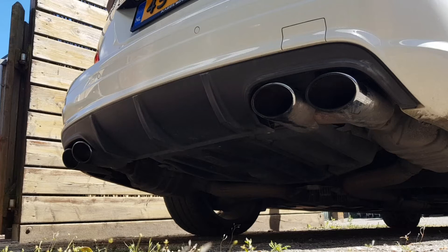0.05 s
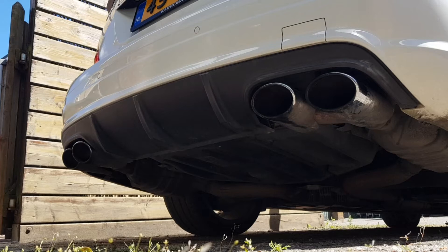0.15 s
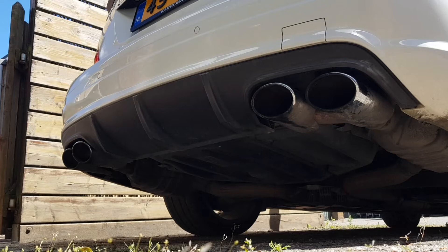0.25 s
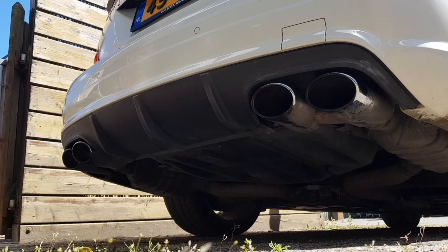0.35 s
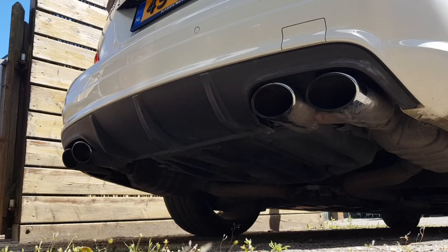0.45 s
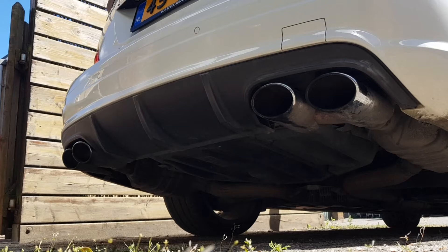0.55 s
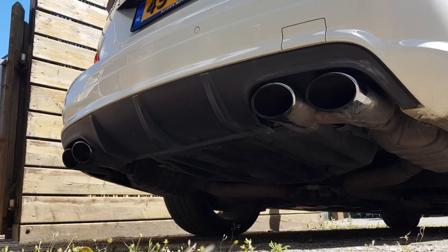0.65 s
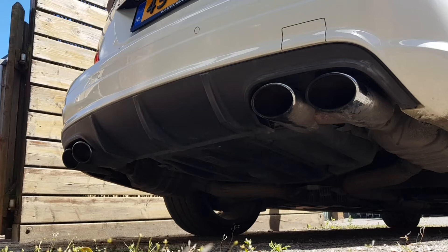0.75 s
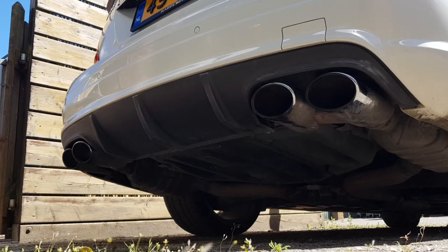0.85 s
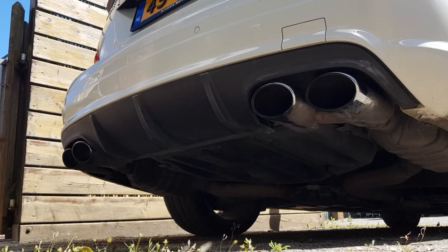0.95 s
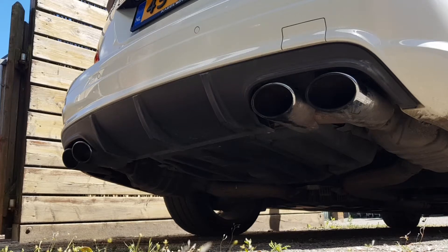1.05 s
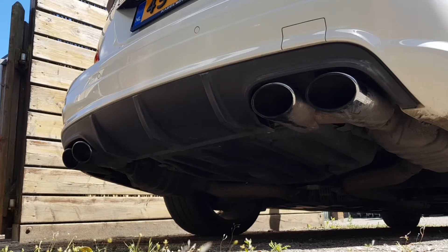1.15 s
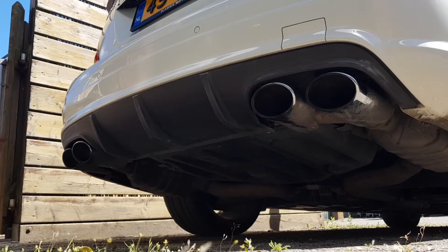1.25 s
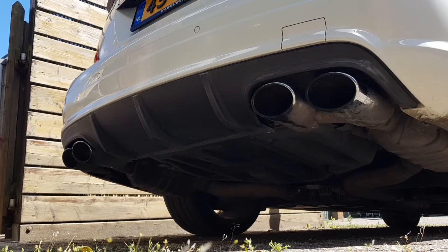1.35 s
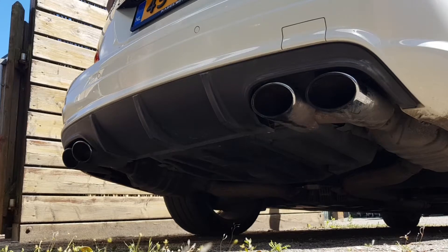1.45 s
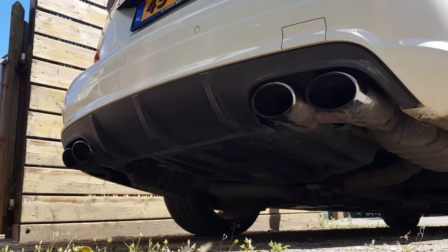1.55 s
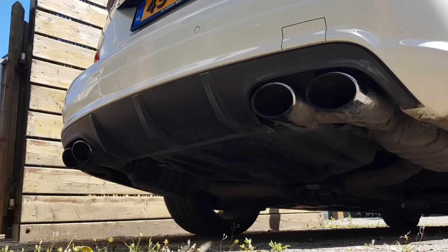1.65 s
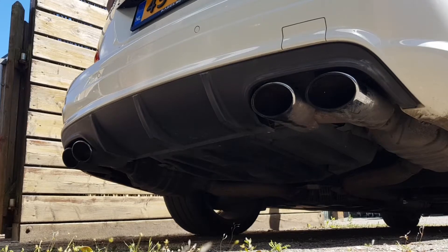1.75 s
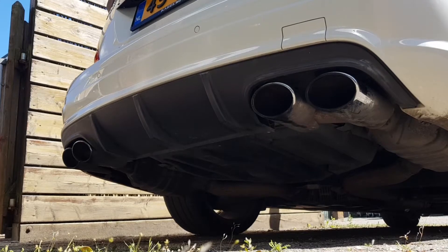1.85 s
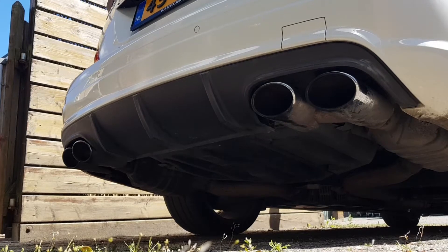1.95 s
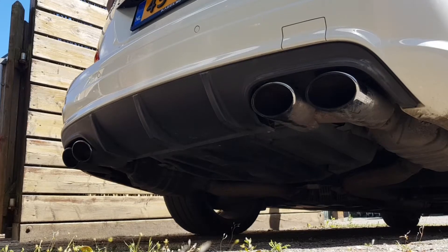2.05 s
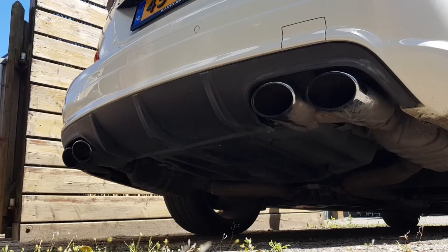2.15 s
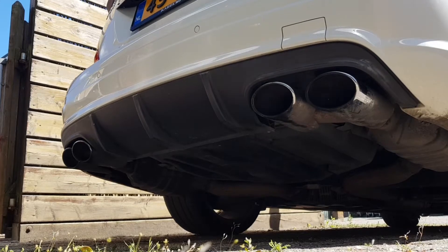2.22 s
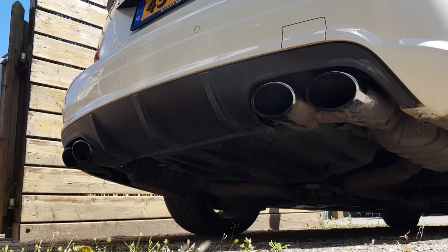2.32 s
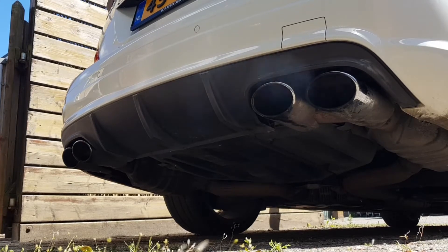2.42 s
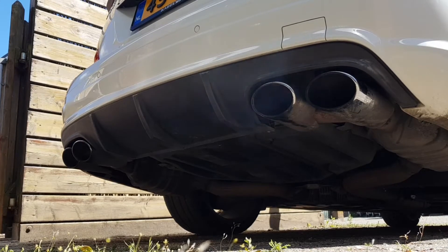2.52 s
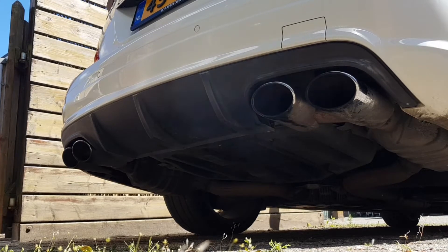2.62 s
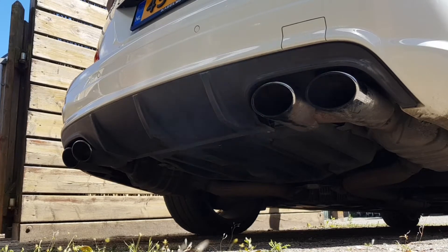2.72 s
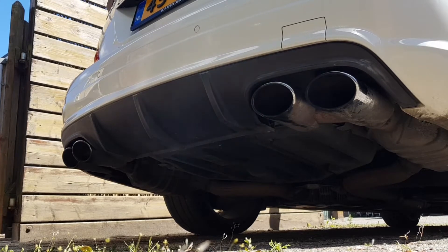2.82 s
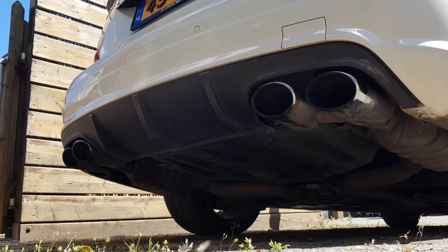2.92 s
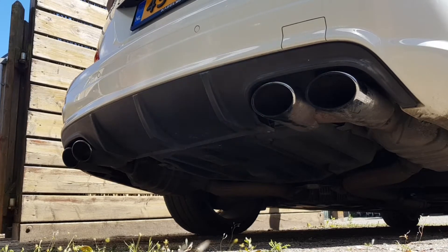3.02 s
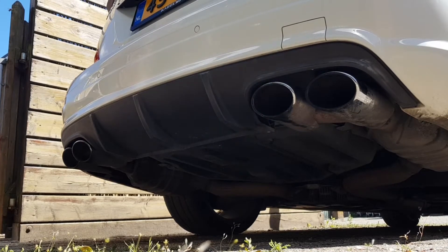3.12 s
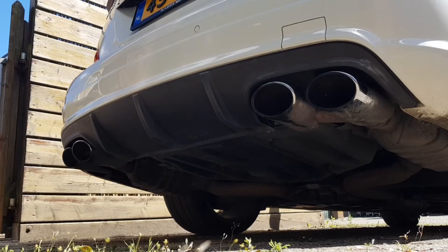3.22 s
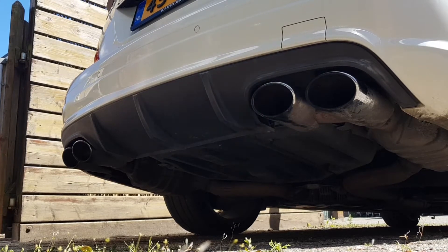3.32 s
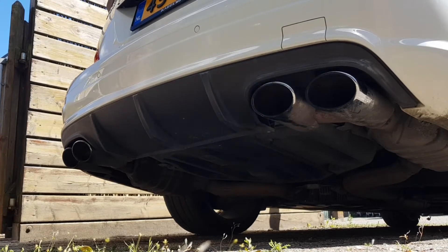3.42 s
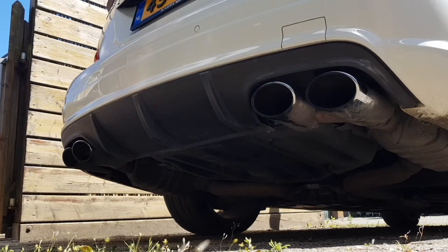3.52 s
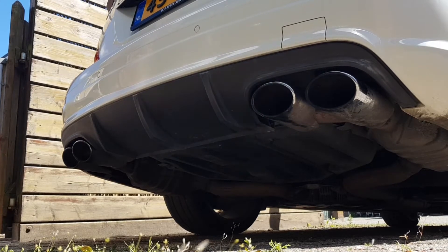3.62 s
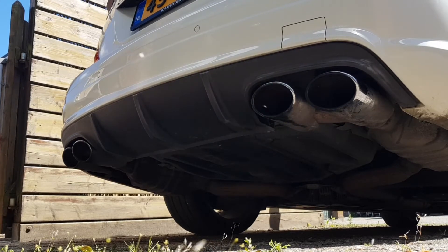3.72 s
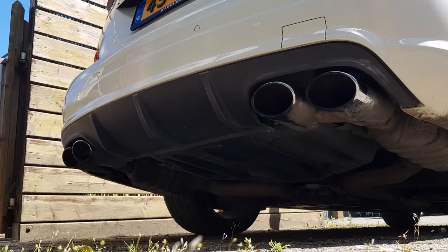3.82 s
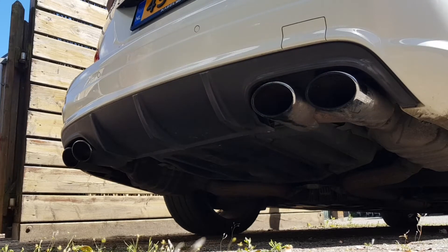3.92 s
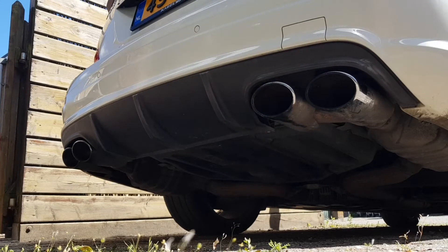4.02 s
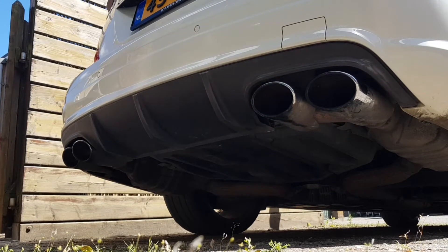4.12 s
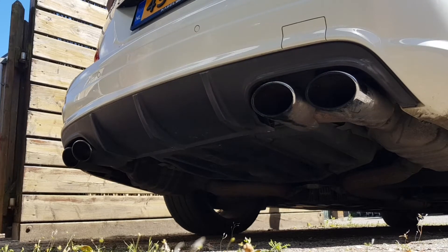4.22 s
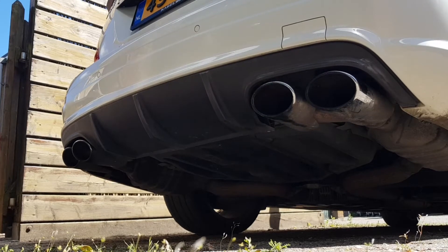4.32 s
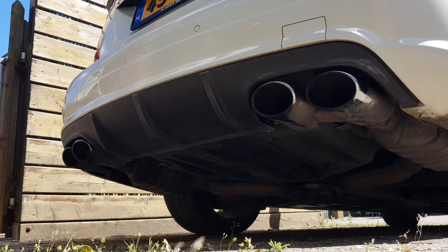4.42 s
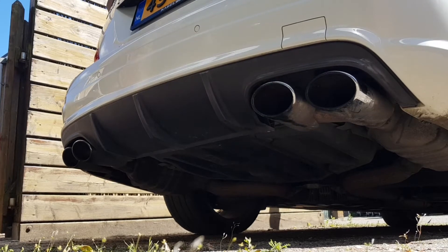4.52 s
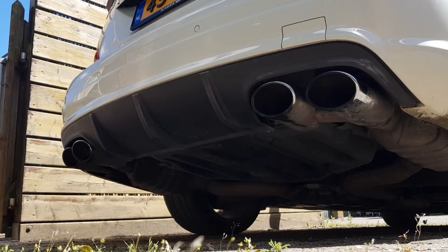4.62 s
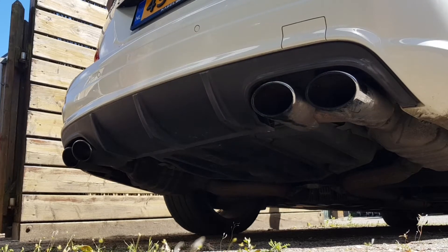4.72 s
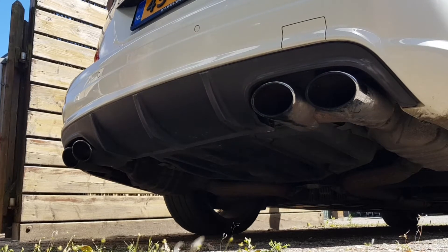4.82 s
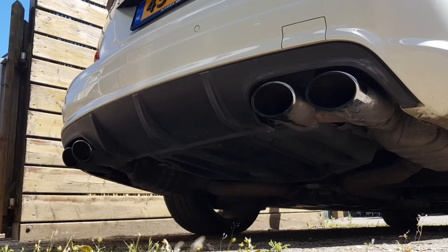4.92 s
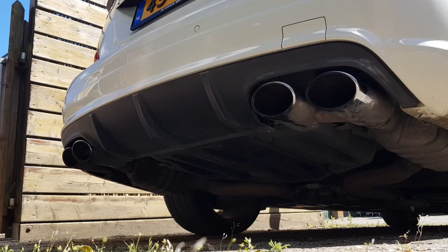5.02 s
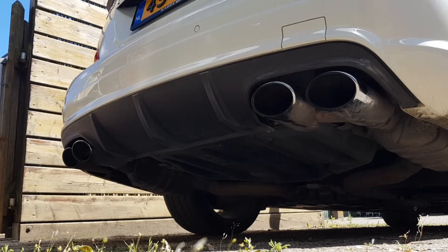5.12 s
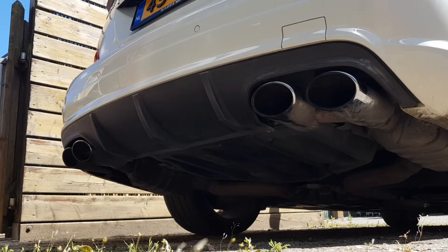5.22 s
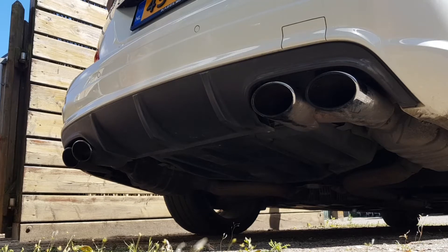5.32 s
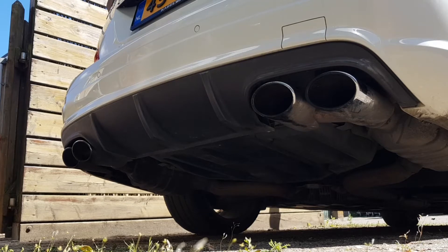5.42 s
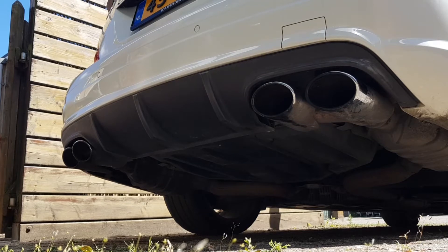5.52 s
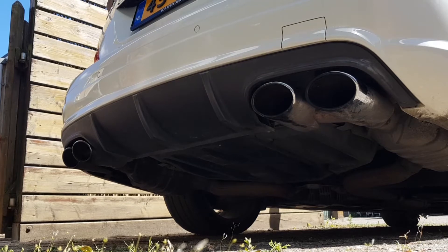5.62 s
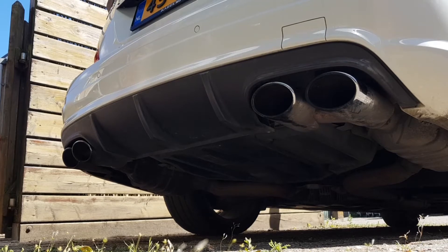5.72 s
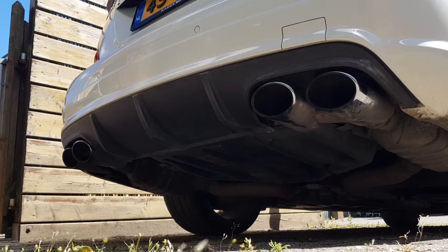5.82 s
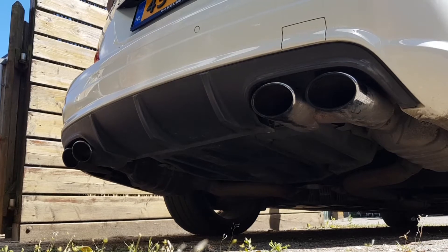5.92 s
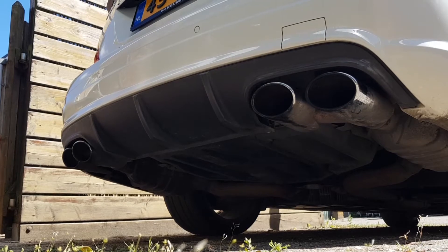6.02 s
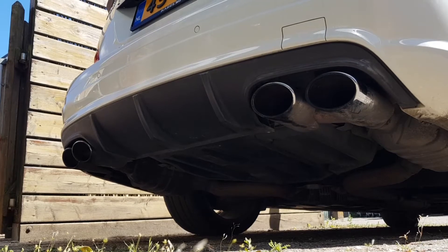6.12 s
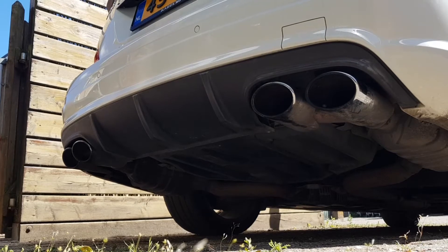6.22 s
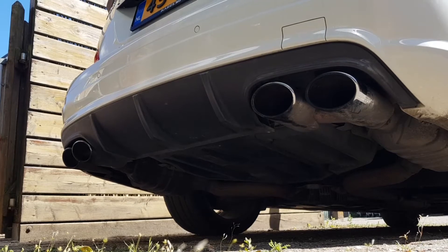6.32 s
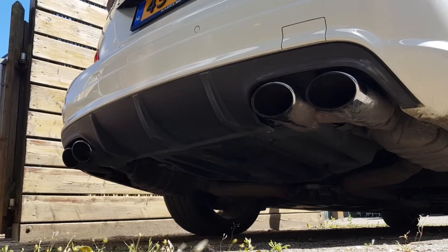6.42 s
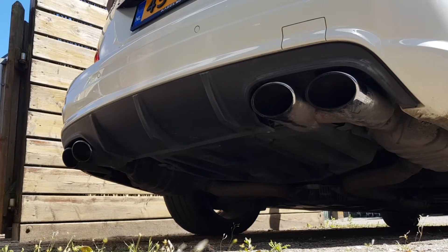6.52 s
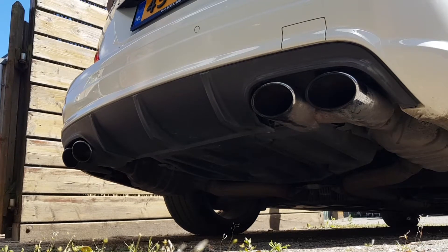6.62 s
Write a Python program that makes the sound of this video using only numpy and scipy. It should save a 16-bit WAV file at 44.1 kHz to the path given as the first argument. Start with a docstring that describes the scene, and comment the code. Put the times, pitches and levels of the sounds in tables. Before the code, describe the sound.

Close behind the tailpipes, a large engine cranks with whining gears, catches in a deep burst of revs, then burbles into uneven idle.

```python
"""Just behind a car's tailpipes, beside a wooden fence, a big V8 is started in quiet outdoor air.
The starter clashes in with bands of noise and ringing gear modes, then whirrs and whines through six strokes.
The engine catches with a deep sine boom, flares and sinks to a lumpy idle with faint valve ticks.
Each firing is an impulse rounded into a thump by the silencer, with bursts of noise for sputter and gas.
Late-burning charges pop and burble: filtered impulses, noise bursts and short notes ring in the pipe."""
import sys
import numpy as np
from scipy import signal
from scipy.fft import rfft, irfft, next_fast_len
from scipy.io import wavfile
from scipy.ndimage import uniform_filter1d, map_coordinates

SR = 44100
rng = np.random.default_rng(int(sys.argv[2]) if len(sys.argv) > 2 else 0)


def file_out(sig):
    """Save sig as 16-bit WAV at sys.argv[1]."""
    # one column per channel
    cols = np.atleast_2d(sig).T
    # limit, then scale
    lim = np.clip(cols, -1, 1)
    pcm = np.round(lim * 32767).astype(np.int16)
    wavfile.write(sys.argv[1], SR, pcm)


N = 293706  # length in samples

# Spectra give the colour of a sound: their levels are relative.
# quiet outdoor air: freq_hz, level_db_per_hz
AIR_SPECTRUM = [(15, -29), (25, -12.5), (59, 1.5), (236, -8.5), (301, 3.5), (363, -7.5), (575, -6),
                (734, -17), (818, -17), (1740, -30), (6560, -36.5), (8590, -44.5), (11900, -30),
                (16000, -32.5)]
# soft thuds before the start: start_s, level_db
THUDS = [(.02, -53), (.32, -48), (.58, -59), (.745, -51)]
# faint clack before the start: freq_hz, level_db_per_hz
CLACK_SPECTRUM = [(500, -19), (950, 7), (1350, -2.5), (1900, -15), (5000, -38)]
# dry click during the idle: freq_hz, level_db_per_hz
CLICK_SPECTRUM = [(300, 5.5), (1500, 16), (4000, 2), (15000, -8)]
# side minus mid level of the diffuse sound: freq_hz, side_db
STEREO_WIDTH = [(100, -2.5), (280, -6), (600, -9.5), (1000, 1.5), (2000, -0.5), (4000, 0), (12000, -1.5)]
# decay of the yard's scatter: freq_hz, t60_s
YARD_DECAY = [(200, 0.66), (700, 0.22), (2500, 0.056), (10000, 0.043)]
# echoes from the pipe ends, the silencer and the fence: delay_s, share (of the direct sound)
ECHOES = [(.00297, .62), (.0058, .26), (.009, .2), (.0116, .32), (.0172, .16), (.0217, .15), (.026, .14)]
# narrow resonances of the exhaust: freq_hz, width_hz, gain_db
PIPE_MODES = [(302.6, 61, -6), (416.4, 12, 5.5), (485.7, 37.5, 6.5), (604, 110, -3.5), (699.4, 14, -2),
              (804, 52, 0.5), (1017.4, 36, 2.5), (1590, 34, 8.5)]

# resonances that colour the valve ticks: freq_hz, width_hz, relative_db
VALVE_MODES = [(3120, 60, -11), (3914, 53, 2), (4180, 300, -6.5), (4570, 250, -5.5)]
# starter speed, which spins up, then dips and rebounds: time_s, speed (share of full speed)
STARTER_SPEED = [(.81, .82), (.87, .98), (.93, 1.02), (1.02, .99), (1.11, .965), (1.21, 1.025), (1.3, .96),
                 (1.38, 1.03), (1.44, .97), (1.49, 1.025), (1.57, .955), (1.63, 1.02), (1.72, 1)]
# motor and gear tones at full speed: pitch_hz, relative_db
WHINE_TONES = [(95, -45), (187, -47.5), (240, -50), (468, -48), (578, -47), (815, -49), (1060, -49),
               (1255, -52), (1560, -59), (2220, -58), (2520, -60), (3720, -58)]
# whirr of the starter gears: freq_hz, level_db_per_hz
GEAR_SPECTRUM = [(160, -39), (280, -15), (321, -18), (465, -5), (722, -7.5), (916, -8.5), (997, -11),
                 (1280, -13), (1400, -18.5), (2530, -15), (3260, -24), (3800, -18), (4570, -19.5),
                 (8850, -38), (14500, -40), (16000, -49.5)]
# clash of the starter engaging: freq_hz, level_db_per_hz
CLASH_SPECTRUM = [(180, -5), (300, -14), (372, -47), (537, -3), (689, -4.5), (915, -7), (1390, -10),
                  (2210, -3), (2740, -9), (3830, -6), (4830, -14.5), (6000, -9.5), (6620, -17),
                  (15000, -33.5), (16000, -29.5)]
# resonances of the starter and bell housing: freq_hz, width_hz, relative_db
HOUSING_MODES = [(580, 23, -4), (900, 29, 4.5), (1020, 71, -20)]
# resonances of the ring gear: freq_hz, width_hz, relative_db
RING_GEAR_MODES = [(557, 15, 7), (893, 20, 2.5), (2330, 31, -8), (2516, 35, -0.5), (3780, 63, 1.5),
                   (3920, 21, -11), (4460, 45, -8), (5050, 70, -9.5), (5500, 45, -12.5)]
# cranking strokes: start_s, boom_db, pipe_ring_db, air_puff_db, housing_ring_db (relative)
STROKES = [(0.825, -33, -33.5, -47, -44), (0.976, -30, -37, -59, -32), (1.164, -20, -31, -43, -32.5),
           (1.327, -23.5, -27, -28, -41), (1.462, -24.5, -31, -29, -41.5), (1.591, -20, -18.5, -26, -45)]
# puff of air from an unfired cylinder: freq_hz, level_db_per_hz
PUFF_SPECTRUM = [(300, 15), (700, -9.5), (1500, -6.5), (5000, 6), (8000, -10), (15500, -20.5)]

# soft burbles in the pipe: start_s, pitch_hz, relative_db, upper_ring_db
BURBLES = [(2.349, 702, -19.5, -34), (2.601, 1250, -32, -46), (2.798, 870, -19.5, -32),
           (2.835, 1070, -22, -41.5), (3.132, 685, -23.5, -39), (3.161, 818, -12.5, -33),
           (3.301, 907, -14, -25.5), (3.47, 856, -21, -44.5), (3.494, 1034, -22.5, -32),
           (3.612, 706, -15, -33.5), (3.65, 1040, -25.5, -37), (3.825, 708, -22.5, -34),
           (3.919, 740, -19.5, -44), (3.932, 697, -32.5, -36), (4.0405, 845, -15, -32),
           (4.255, 734, -19.5, -31.5), (4.362, 834, -18, -40), (4.682, 703, -21, -32),
           (5.19, 1093, -22.5, -33), (5.283, 1150, -29, -45.5), (5.389, 624, -32, -43),
           (5.506, 700, -17, -39.5), (5.926, 630, -21, -38), (6.3, 708, -31, -40), (6.642, 1150, -25, -48)]
# late-burning charges: start_s, pop_db, throaty_bark_db, crack_db (all relative)
POPS = [(1.73, -6, -25.5, -25), (1.7478, -9.5, -20, -30), (1.7545, -20, -28, -29.5),
        (1.7717, -11.5, -31, -30), (1.789, -.5, -31, -23), (1.8003, -2.5, -24, -30),
        (1.812, -9.5, -28.5, -40), (1.8325, -5.5, -37, -37), (1.8419, -14, -26, -35.5),
        (1.8495, -1.5, -29, -29), (1.859, -11.5, -36, -36), (1.8669, -4, -28.5, -28),
        (1.8771, -8, -25, -35), (1.9027, -22.5, -23, -46), (1.9229, -9.5, -26.5, -31),
        (1.9401, -8.5, -30, -43), (1.9623, -9.5, -29, -31), (1.9791, -15.5, -21, -49),
        (1.9966, -11.5, -37, -48), (2.014, -5.5, -40, -33), (2.0252, -7.5, -31, -28),
        (2.034, -14, -39.5, -43), (2.0399, -15.5, -39.5, -54), (2.0737, -12.5, -46.5, -42),
        (2.0902, -7.5, -37, -34), (2.1009, -9, -40.5, -47.5), (2.185, -19, -46.5, -52),
        (2.2706, -6, -29, -44.5), (2.326, -5, -33, -42), (2.404, -19.5, -39, -50),
        (2.515, -5.5, -28.5, -48), (2.6366, -7, -21.5, -28), (2.8097, -13.5, -35, -58),
        (2.8338, -12, -32.5, -39.5), (2.909, -9, -42, -49), (3.008, -9, -35.5, -53),
        (3.0325, -13.5, -46, -48), (3.1102, -4.5, -28, -53), (3.1621, -9, -29, -39),
        (3.2115, -7.5, -34, -47), (3.274, -15, -39, -40), (3.3134, -9.5, -40, -43.5),
        (3.3395, -13.5, -44.5, -59), (3.4157, -6.5, -29.5, -33.5), (3.441, -13.5, -38.5, -45.5),
        (3.4696, -13.5, -39, -54), (3.5195, -5.5, -30, -37.5), (3.6252, -8.5, -30.5, -50.5),
        (3.6507, -25, -34, -43), (3.7305, -7, -27.5, -43.5), (3.7572, -17.5, -43, -36.5),
        (3.786, -18.5, -46.5, -53), (3.8383, -9, -40, -52), (3.905, -17.5, -37, -51),
        (3.947, -16.5, -43, -57), (3.973, -24, -40.5, -61), (3.987, -19.5, -45.5, -53.5),
        (4.0543, -11.5, -49.5, -58.5), (4.12, -10.5, -34.5, -57), (4.1599, -10, -39, -59),
        (4.2671, -10, -39, -57.5), (4.2938, -11.5, -41, -52), (4.414, -14.5, -34.5, -47),
        (4.4815, -9, -39.5, -53), (4.5071, -11, -27.5, -39.5), (4.5889, -9.2, -49, -52),
        (4.6274, -9.5, -40, -51), (4.695, -4.5, -34.5, -42.5), (4.7208, -23, -40, -48),
        (4.787, -14.5, -40.5, -52), (4.8002, -13, -51, -50), (4.8671, -12.5, -30, -41),
        (4.9085, -7.5, -49.5, -50.5), (5.0138, -2.5, -29.5, -45), (5.0538, -9.5, -46.5, -49),
        (5.1905, -12, -34.5, -49), (5.203, -13.5, -50, -39), (5.256, -16.5, -46, -48),
        (5.4129, -7, -38, -52.5), (5.5175, -5, -35.5, -52), (5.685, -21, -47.5, -49.5),
        (5.7278, -9, -49.5, -33.5), (5.8347, -5.5, -35, -45.5), (5.873, -6.5, -47.5, -37.5),
        (5.9393, -9, -41, -36), (5.9651, -7.5, -48, -36), (5.979, -16.5, -40, -52), (6.0062, -10, -45, -49),
        (6.049, -17, -45.5, -55), (6.0714, -8.5, -44, -52), (6.105, -15, -38, -43),
        (6.151, -4.5, -31.5, -37.5), (6.2576, -2.5, -34.5, -49.5), (6.3235, -11, -33, -34),
        (6.4962, -11, -53, -52), (6.5742, -0.5, -27.5, -46)]
# body of a pop: freq_hz, level_db_per_hz
POP_SPECTRUM = [(60, -26.5), (180, -8), (300, -1.5), (600, 0.5), (800, 1), (1000, -11), (1280, -9.5),
                (1400, -41), (1600, -32), (2500, -48.5), (4000, -52.5), (8000, -68), (16000, -75.5)]
# throaty bright part of pops and sputter: freq_hz, level_db_per_hz
BARK_SPECTRUM = [(500, -28), (900, 0), (1250, 15.5), (1400, -8), (1560, 7.5), (1800, -13.5), (2300, -17.5),
                 (4000, -49)]
# sharp crackling part of pops and sputter: freq_hz, level_db_per_hz
CRACK_SPECTRUM = [(500, -32), (1200, -15.5), (1900, 10), (2700, 4.5), (3500, -19), (5000, -17), (8000, -43),
                  (16000, -38.5)]

# engine speed, a flare then a slow sag to idle: time_s, rate_hz (firings per second)
ENGINE_SPEED = [(1.7, 63.12), (1.8, 97.48), (1.9, 107.34), (2.05, 105.01), (2.2, 94.45), (2.4, 84.25),
                (2.65, 81.48), (3.2, 78.59), (3.9, 74.15), (4.75, 75.4), (5.1, 74.39), (5.4, 76.11),
                (6.66, 75.43)]
# the eight cylinders in firing order: thump_db, lateness (firing intervals), rasp_db (levels relative)
CYLINDERS = [(4, -0.083, 2.5), (5.5, 0.013, 5), (2, -0.05, 3), (4.5, 0.03, 2.5), (5.5, -0.0067, 7),
             (8, -0.075, 3.5), (3.5, 0.063, 2.5), (3, -0.12, 5.5)]
# the engine flares, coasts, then takes up load at idle: time_s, thump_db, rasp_db, gas_hiss_db (relative)
EFFORT = [(1.72, -19.5, -18, -41), (1.85, -20.5, -23, -50), (2.08, -24, -30, -62), (2.4, -30, -34.5, -65.5),
          (3.5, -26.5, -34, -69), (4.1, -26.5, -31, -66.5), (4.75, -22, -28.5, -61.5),
          (6.66, -21, -27, -61)]
# firing thump through the silencer: freq_hz, level_db_per_hz
THUMP_SPECTRUM = [(15, -47), (30, -14), (40, -5), (52, 12), (76, .5), (105, 0.5), (150, 0), (180, -6.5),
                  (220, -23), (300, -45.5), (600, -36.5), (1500, -100)]
# the silencer's irregular rumble: freq_hz, level_db_per_hz
RUMBLE_SPECTRUM = [(15, -37), (28, -18), (42, 1.5), (53, -0.5), (62, -13), (200, -72.5)]
# sputter of unevenly burning gas: freq_hz, level_db_per_hz
SPUTTER_SPECTRUM = [(100, -26.5), (280, 5), (560, -2), (740, 4), (900, -15), (1060, -5), (1280, -18),
                    (1420, -32.5), (1600, -29.5), (2200, -36), (4000, -62)]
# exhaust rasp: freq_hz, level_db_per_hz
RASP_SPECTRUM = [(120, -31), (200, -4), (254, -9.5), (335, -23.5), (485, -2), (540, -15), (695, -8.5),
                 (926, -18.5), (1020, -21), (1390, -39.5), (1530, -19), (1730, -60.5), (1900, -32.5),
                 (3500, -62.5), (4550, -71), (7700, -120)]
# exhaust gas hiss: freq_hz, level_db_per_hz
HISS_SPECTRUM = [(1200, -19), (2200, 3.5), (4600, -3), (6500, -8.5), (8000, -14), (11000, -15),
                 (15500, -27)]

TOP_HZ = 15900  # upper band limit
CATCH_S = 1.696  # the engine fires
SKIP_S = 5.11  # at the click the firing pattern skips two cylinders
LEAN_OUT_DB_PER_S = 0.23  # the sputter loses its bright edge as the mixture leans out
# the starter engages, then its gears surge once in each cranking stroke
ENGAGE_S = 0.81
SURGE_AT = 0.21  # loudest point as a share of the stroke
HOUSING_DB, HOUSING_SWING_DB = -4, 5
WHIRR_DB, WHIRR_SWING_DB, WHIRR_RISE_DB_PER_S = -38.5, 0.5, 6.5
WHINE_DB, WHINE_SWING_DB, WHINE_RISE_S = 0.5, 2.5, 0.14
MESH_HZ, TOOTH_CYCLE_HZ = 917, 46.5  # at full starter speed
# the first charges keep the silencer booming for a moment
CATCH_DB, CATCH_HZ, CATCH_OVERTONE_DB = -5.5, 56.2, -10
CATCH_RISE_S, CATCH_HOLD_S, CATCH_T60_S = 0.0065, 0.06, 0.46
STUMBLE_S, STUMBLE_DB = 2.135, -12.5  # one heavy beat as the revs fall
FLAME_DB = -28.5  # relative to the pop
UPPER_RING_HZ = 1552  # the upper pipe mode that burbles set off, varied a little for each


def amp(db):
    """Decibels to gain."""
    return 10 ** (np.asarray(db) / 20)


def unit(x):
    """Scale x to rms 1."""
    return x / np.sqrt(np.mean(x ** 2) + 1e-20)


def along(points, hz):
    """Read (frequency, value) points on a log frequency axis."""
    freq, value = np.transpose(points)
    return np.interp(np.log(hz + 1), np.log(freq + 1), value)


def clock():
    """The time of every sample in seconds."""
    return np.arange(N) / SR


def curves(rows):
    """One value per sample for each column after the time."""
    time, *columns = np.transpose(rows)
    return [np.interp(clock(), time, column) for column in columns]


def wobble(rate):
    """A smooth random curve with this many knots a second."""
    knots = rng.standard_normal(int(N * rate / SR) + 4)
    return map_coordinates(knots, [clock() * rate])


def filtered(x, response):
    """Shape x by a complex response of frequency."""
    size = 2 * next_fast_len(N // 2 + SR // 4)
    hz = np.fft.rfftfreq(size, 1 / SR)
    return irfft(rfft(x, size) * response(hz), size)[..., :N]


def causal(points, hz):
    """The minimum-phase response with this spectrum: its energy comes as early as it can."""
    cepstrum = irfft(np.log(amp(along(points, hz))))
    half = len(hz) - 1
    return np.exp(rfft(np.r_[cepstrum[0], 2 * cepstrum[1:half], np.zeros(half)]))


def stereo(pair, spectrum):
    """Colour two signals as mid and side, then decode to left and right at rms 1."""
    def response(hz):
        return amp(along(spectrum, hz)) * [np.ones_like(hz), amp(along(STEREO_WIDTH, hz))]
    mid, side = filtered(pair, response)
    return unit(np.array([mid + side, mid - side]))


def rush(spectrum):
    """Stereo noise of rms 1 whose width varies with frequency."""
    return stereo(rng.standard_normal((2, N)), spectrum)


def resonances(modes, hz):
    """The summed complex response of damped resonances."""
    return sum(amp(db) * 1j * hz * width / (centre * centre - hz * hz + 1j * hz * width)
               for centre, width, db in modes)


def ringing(modes):
    """Stereo noise of rms 1 coloured by narrow resonances and a broad roll-off around 1500 Hz."""
    spectrum = []
    for hz in np.geomspace(200, TOP_HZ, 900):
        broad = abs(resonances([(1500, 6000, 0)], hz)) ** 2
        spectrum.append((hz, 20 * np.log10(abs(resonances(modes, hz)) * broad)))
    return rush(spectrum)


def spikes(times, sizes):
    """Single impulses at the given times."""
    places = np.clip(np.round(times * SR).astype(int), 0, N)
    return np.bincount(places, sizes, N + 1)[:N]


def knocks(times, db, spectrum):
    """Hard-fronted impulses with this spectrum."""
    return filtered(spikes(times, amp(db)), lambda hz: causal(spectrum, hz))


def swell(start, rise, t60):
    """An envelope that climbs to 1 and dies away exponentially."""
    age = clock() - start
    return np.clip(age / rise, 0, 1) * amp(-60 * np.maximum(age - rise, 0) / t60)


def bursts(times, db, rise, t60):
    """An envelope with one short swell at each time."""
    shape = swell(0, rise, t60)[:SR // 6]
    return signal.fftconvolve(spikes(times, amp(db)), shape)[:N]


def boom(start, rise, t60, hz=50):
    """A low resonance set swinging by a slow push: a sine that swells and dies away."""
    return swell(start, rise, t60) * np.sin(2 * np.pi * hz * (clock() - start))


def patchy(x, depth_db):
    """Short-lived patches of pitch come and go as a smoothed random field weights the spectrogram."""
    z = signal.stft(x, nperseg=1024)[2]
    field = uniform_filter1d(rng.standard_normal(z.shape[1:]), size=4, axis=0)
    field = uniform_filter1d(field, size=5, axis=1)
    return unit(signal.istft(z * amp(depth_db * unit(field)), nperseg=1024)[1][:, :N])


def yard(x, wet_db):
    """The sound plus a short scatter from ground, car and fence, different at each ear."""
    hz, t, z = signal.stft(rng.standard_normal((2, SR // 4)), SR, nperseg=256)
    decay = amp(-60 * t / along(YARD_DECAY, hz)[:, None])
    tail = signal.istft(z * decay, SR, nperseg=256)[1]
    tail = tail / np.linalg.norm(tail[0])
    return x + amp(wet_db) * signal.fftconvolve(np.atleast_2d(x), tail, axes=1)[:, :N]


def underbody(x, wet_db, t60=0.02):
    """Close reflections between car and ground carve fine, fixed peaks into a sound."""
    t = np.arange(SR // 20) / SR
    scatter = rng.standard_normal(len(t)) * amp(-60 * t / t60)
    scatter = scatter[None] / np.linalg.norm(scatter)
    echo = signal.fftconvolve(x, scatter, axes=1)[:, :N]
    return (x + amp(wet_db) * echo) / np.sqrt(1 + amp(wet_db) ** 2)


def echoes(hz):
    """The response of the pipe ends, silencer and fence: delayed copies of the direct sound."""
    return 1 + sum(share * np.exp(-2j * np.pi * hz * delay) for delay, share in ECHOES)


def tailpipe(x):
    """A pulse rings the pipe's modes, runs to and fro in it and returns from farther walls."""
    return filtered(x, lambda hz: (1 + resonances(PIPE_MODES, hz)) * echoes(hz))


def firings():
    """Engine speed adds up to a count of firings; also gives the time and cylinder of each one."""
    turns = np.cumsum(curves(ENGINE_SPEED)[0] * (clock() >= CATCH_S)) / SR
    number = np.arange(int(turns[-1]) + 1)
    shifted = number + 2 * (number > np.interp(SKIP_S, clock(), turns))
    cylinder = np.array(CYLINDERS)[shifted % len(CYLINDERS)]
    late = cylinder[:, 1] + 0.012 * rng.standard_normal(len(number))
    times = np.interp(np.maximum(number + late, 1e-6), turns, clock())
    return turns, times, cylinder


def surroundings():
    """Quiet outdoor air is drifting noise; thuds are low decaying sines and the clack a noise swell."""
    air = amp(-57 + 1.7 * wobble(3.3)) * rush(AIR_SPECTRUM)
    thuds = sum(amp(db) * boom(s, rise=0.015, t60=0.092, hz=55.4) for s, db in THUDS)
    clack = amp(-56.5) * swell(0.6, rise=0.008, t60=0.3) * rush(CLACK_SPECTRUM)
    return air + thuds + clack


def click():
    """One dry, very short click during the idle: a single filtered impulse."""
    return knocks(np.array([5.1103]), [-11], CLICK_SPECTRUM)


def valves():
    """The valves tick twice per firing, each tick a ringing noise burst of its own strength."""
    turns = firings()[0]
    times = np.interp(np.arange(1, 2 * turns[-1]) / 2, turns, clock())
    hiss_db = curves(EFFORT)[2]
    tick_db = np.interp(times, clock(), hiss_db) + 0.8 + 3.9 * rng.standard_normal(len(times))
    return bursts(times, tick_db, rise=0.00077, t60=0.025) * ringing(VALVE_MODES)


def grind(turns):
    """Worn teeth rub alike on every revolution: a dense comb of tones that follows the speed."""
    pattern = rng.standard_normal((2, round(SR / TOOTH_CYCLE_HZ)))
    rub = np.array([map_coordinates(row, [turns * SR], mode="grid-wrap") for row in pattern])
    return stereo(rub, GEAR_SPECTRUM)


def starter():
    """The pinion clashes into the ring gear; motor and gears surge, loudest soon after each stroke begins."""
    age = np.maximum(clock() - ENGAGE_S, 0)
    engaged = np.interp(clock(), [ENGAGE_S, 0.85, CATCH_S, 1.8], [0, 1, 1, 0])
    beats = [s for s, *_ in STROKES] + [CATCH_S]
    stroke_position = np.interp(clock(), beats, np.arange(len(beats)))
    surge = np.cos(2 * np.pi * (stroke_position - SURGE_AT))

    # the teeth hit, then hit again more softly
    hits = amp(-25.5) * swell(0.806, rise=0.021, t60=0.095)
    hits = hits + amp(-36) * swell(0.826, rise=0.0069, t60=0.026)
    clash = hits * (rush(CLASH_SPECTRUM) + 0.99 * ringing(RING_GEAR_MODES))

    # full-speed seconds turned so far, with a slight random unevenness
    turns = np.cumsum(curves(STARTER_SPEED)[0] * (1 + 0.004 * wobble(30))) / SR

    def gear_tone(hz):
        """Backlash between the teeth roughens the phase of higher tones most."""
        backlash = min(hz / 2200, 1.2) * wobble(170)
        return np.sin(2 * np.pi * hz * turns + backlash)

    tones = sum(amp(db) * amp(4 * wobble(16)) * gear_tone(hz) for hz, db in WHINE_TONES)
    whine = amp(WHINE_DB + WHINE_SWING_DB * surge) * np.minimum(age / WHINE_RISE_S, 1) * tones
    mesh = gear_tone(MESH_HZ) + 0.6 * ringing(HOUSING_MODES)
    housing = amp(HOUSING_DB + curves(STROKES)[-1] + HOUSING_SWING_DB * surge) * mesh
    teeth = patchy(grind(turns) + rush(GEAR_SPECTRUM), depth_db=3)
    whirr_db = WHIRR_DB + WHIRR_SWING_DB * surge + WHIRR_RISE_DB_PER_S * np.minimum(age, 1)
    whirr = amp(whirr_db + 2.24 * wobble(150)) * teeth
    return clash + engaged * (whirr + housing + yard(whine, wet_db=-14))


def cranking(ring_hz=474):
    """Unfired cylinders let their air out: a boom, a hollow ring and a puff."""
    booms = sum(amp(db) * boom(s, rise=0.032, t60=0.23) for s, db, *_ in STROKES)
    rings = sum(amp(db) * swell(s, rise=0.018, t60=0.17) for s, _, db, *_ in STROKES)
    puffs = sum(amp(db) * swell(s, rise=0.003, t60=0.092) for s, _, _, db, _ in STROKES)
    hollow = np.sin(2 * np.pi * ring_hz * clock() + 0.15 * wobble(80)) + 0.73 * rush(RASP_SPECTRUM)
    return booms + rings * hollow + puffs * rush(PUFF_SPECTRUM)


def catch():
    """The first full charges heave the silencer into a long, deep boom with steep fronts."""
    age = np.maximum(clock() - CATCH_S, 0)
    fade_db = -60 * np.maximum(age - CATCH_HOLD_S, 0) / CATCH_T60_S
    envelope = np.minimum(age / CATCH_RISE_S, 1) * amp(CATCH_DB + fade_db)
    phase = 2 * np.pi * CATCH_HZ * age
    return -envelope * (np.sin(phase) + amp(CATCH_OVERTONE_DB) * np.sin(2 * phase))


def stumble():
    """One heavy beat as the revs fall sets a low resonance swinging."""
    return amp(STUMBLE_DB) * boom(STUMBLE_S, rise=0.02, t60=0.18, hz=53.5)


def burbles(spread=0.02):
    """Weaker charges burn softly: each is a short, hollow note with the pipe's upper mode on top."""
    t = clock()[:SR // 10]
    low, high = np.zeros((2, N + len(t)))
    fall = swell(0, rise=0.0026, t60=0.024)[:len(t)]
    ring = swell(0, rise=0.0079, t60=0.026)[:len(t)]
    for (s, hz, db, ring_db), chance in zip(BURBLES, rng.standard_normal(len(BURBLES))):
        place = slice(round(s * SR), round(s * SR) + len(t))
        upper_hz = UPPER_RING_HZ * (1 + spread * chance)
        low[place] += amp(db - 1.5) * fall * np.sin(2 * np.pi * hz * t)
        high[place] += amp(ring_db) * ring * np.sin(2 * np.pi * upper_hz * t)
    return yard(filtered(low[:N], echoes) + high[:N], wet_db=-10.5)


def afterfire():
    """Unburnt mixture goes off in the pipe: a hollow pop, a ragged flame, a hard front, a bark and a crack."""
    times, pop_db, bark_db, crack_db = np.transpose(POPS)
    pops = knocks(times + 0.00021, pop_db + 24.5, POP_SPECTRUM)
    flames = bursts(times + 0.0022, pop_db + FLAME_DB, rise=0.0045, t60=0.065) * rush(SPUTTER_SPECTRUM)
    front = knocks(times + 0.00023, bark_db + 10, BARK_SPECTRUM)
    bark = bursts(times, bark_db + 3, rise=0.0016, t60=0.043) * rush(BARK_SPECTRUM)
    crack = bursts(times, crack_db + 1.5, rise=0.00078, t60=0.012) * rush(CRACK_SPECTRUM)
    hollow = yard(tailpipe(pops + flames), wet_db=-14)
    bright = underbody(filtered(front + bark + crack, echoes), wet_db=-13)
    return hollow + bright


def engine():
    """Each firing gives a deep thump, a rough sputter and a gush of gas."""
    turns, times, cylinder = firings()
    thump_db, rasp_db, hiss_db = curves(EFFORT)
    chance = rng.standard_normal((len(times), 5))
    running = np.clip((clock() - CATCH_S) / 0.0056, 0, 1)

    def at_firings(curve):
        """A running curve read at each firing."""
        return np.interp(times, clock(), curve)

    def silencer(hz):
        """Rounds each push into a smooth dip that arrives 2.9 ms later."""
        return amp(along(THUMP_SPECTRUM, hz)) * np.exp(-2j * np.pi * hz * 0.0029)

    push_db = at_firings(thump_db) + cylinder[:, 0] + 1.2 * chance[:, 0] + 47.5
    pushes = spikes(times, amp(push_db))
    thump = filtered(-pushes, silencer) * amp([[0.4], [-0.4]])  # slightly louder on the left
    rumble = amp(thump_db - 10) * running * unit(rush(RUMBLE_SPECTRUM).mean(axis=0))

    # a rich mixture burns unevenly: the sputter comes in clusters, a little after each firing
    spit_times = times + 0.0037 + 0.0026 * chance[:, 3]
    spit_db = at_firings(rasp_db + 2 * wobble(14)) + cylinder[:, 2]
    sputter = bursts(spit_times, spit_db + 2 * chance[:, 1] - 5.5, rise=0.001, t60=0.026)
    sputter = sputter * rush(SPUTTER_SPECTRUM)
    edge_db = spit_db - LEAN_OUT_DB_PER_S * (times - SKIP_S)
    crackle = bursts(spit_times, edge_db + 2.5 * chance[:, 2] - 22, rise=0.002, t60=0.027)
    crackle = crackle * rush(CRACK_SPECTRUM)
    barks = bursts(spit_times, edge_db + 2.5 * chance[:, 4] - 21, rise=0.002, t60=0.045)
    barks = barks * rush(BARK_SPECTRUM)

    rasp = amp(rasp_db - 5 + 2.73 * wobble(25)) * running * rush(RASP_SPECTRUM)
    # the gas rushes hardest just after each exhaust valve opens
    gush = unit(amp(-3 * (turns % 1)))
    hiss = amp(hiss_db + 6 + 1.1 * wobble(16)) * gush * running * rush(HISS_SPECTRUM)
    bright = underbody(crackle + barks + hiss, wet_db=-6, t60=0.07)
    return thump + rumble + tailpipe(sputter) + rasp + bright


def scene():
    """The surroundings, the starter and the running engine, summed in stereo."""
    background = surroundings() + click() + valves()
    starting = starter() + cranking() + catch() + stumble()
    exhaust = burbles() + afterfire() + engine()
    return background + starting + exhaust


def record(dry):
    """The loudest peaks are rounded off, the last 6 ms fade, and nothing is kept above the band limit."""
    rounded = dry / (1 + np.abs(dry) ** 8) ** (1 / 8)
    ending = np.clip((N - np.arange(N)) / (SR * 0.006), 0, 1)
    return filtered(rounded * ending, lambda hz: hz < TOP_HZ)


dry = scene()
out = record(dry)
file_out(out)
```